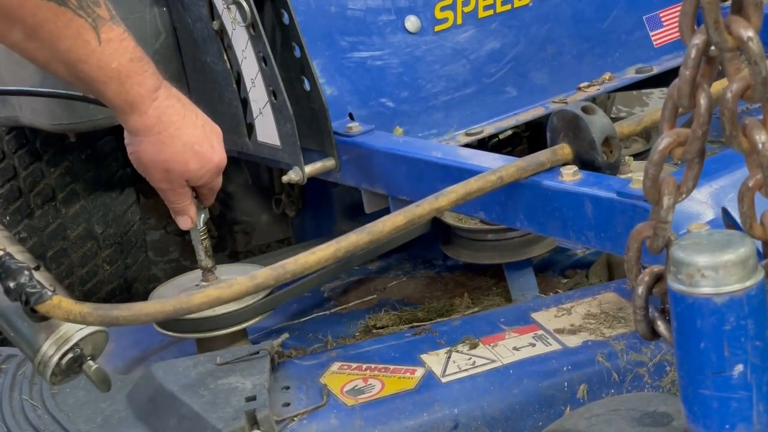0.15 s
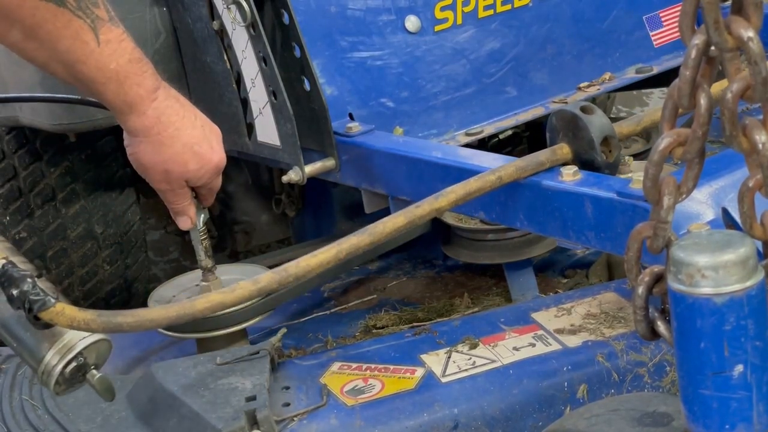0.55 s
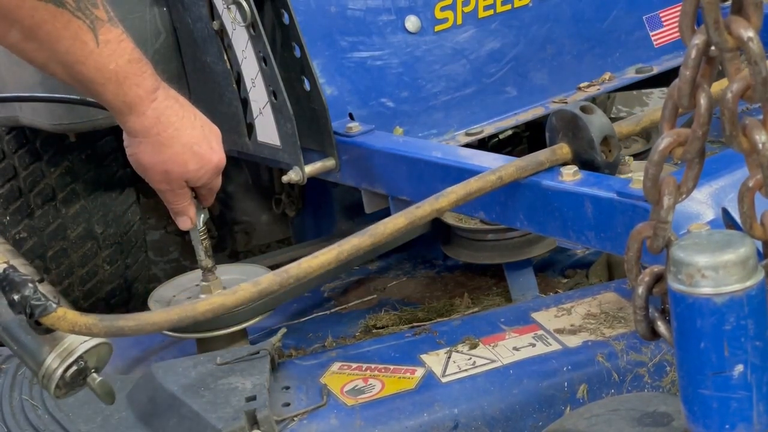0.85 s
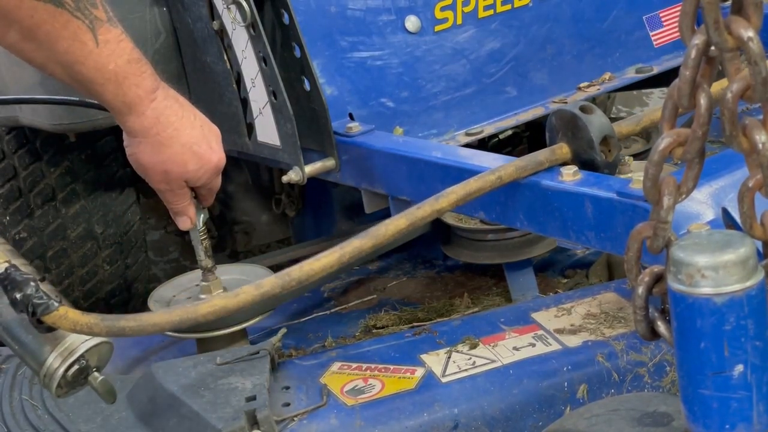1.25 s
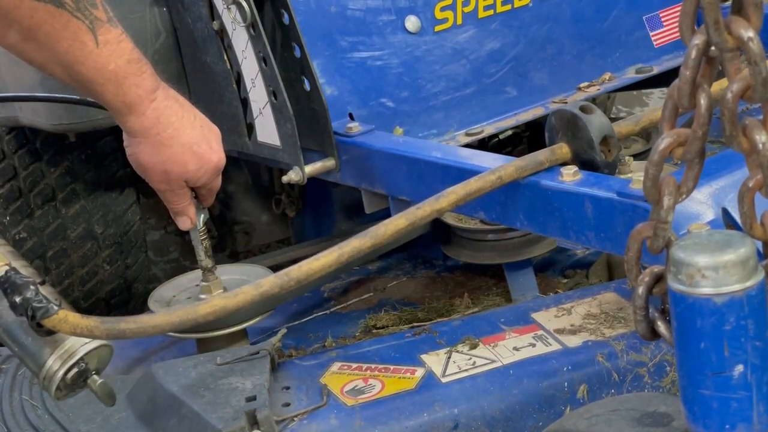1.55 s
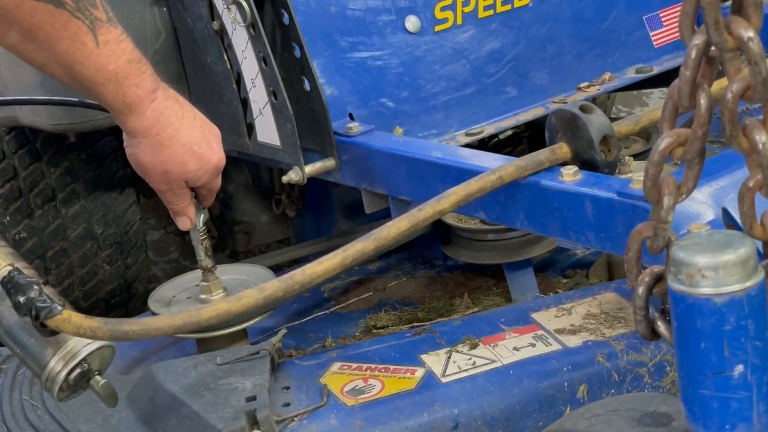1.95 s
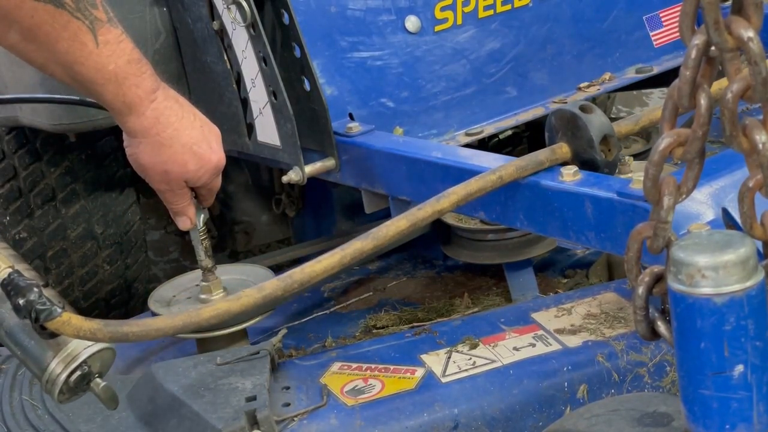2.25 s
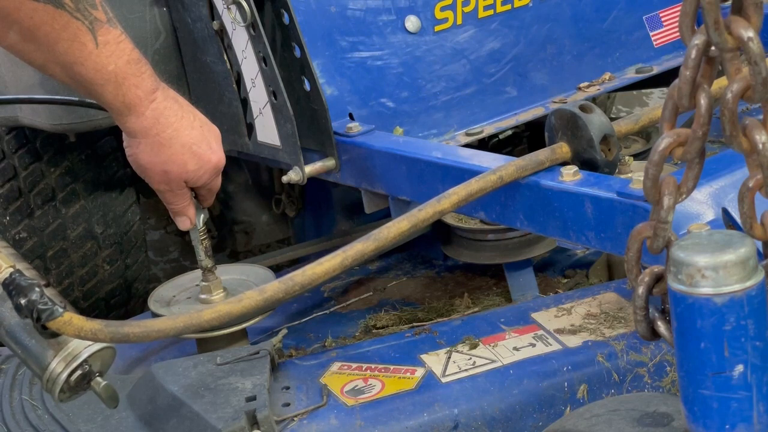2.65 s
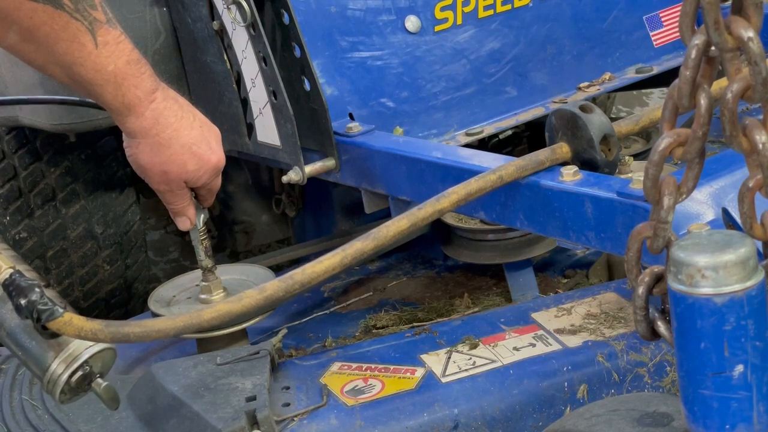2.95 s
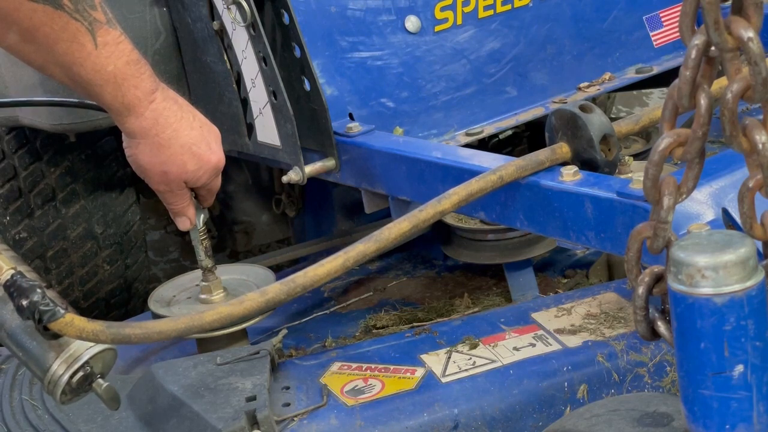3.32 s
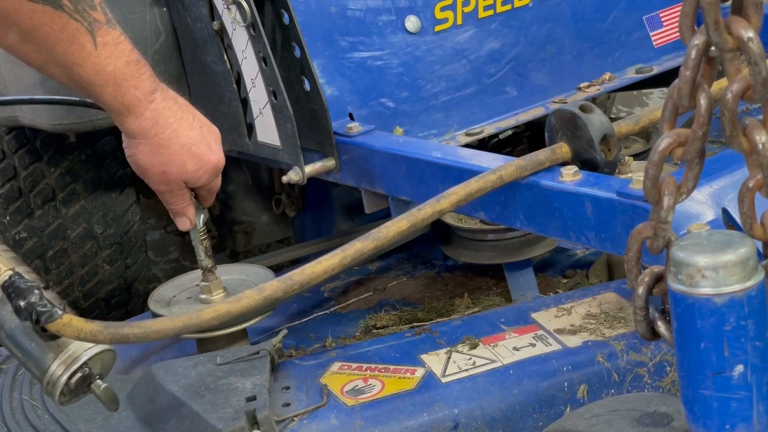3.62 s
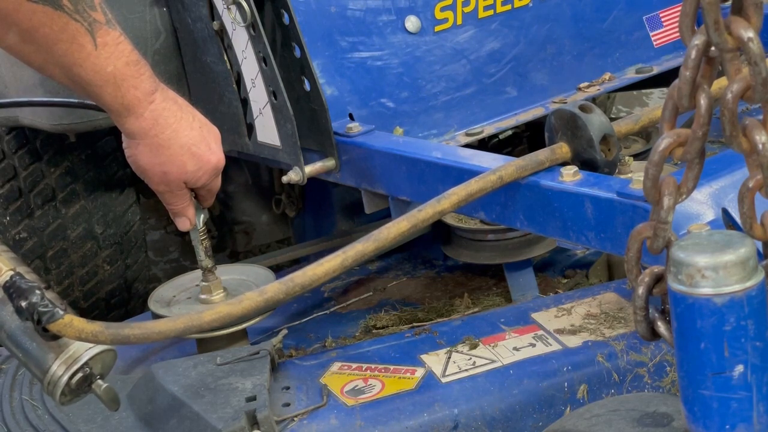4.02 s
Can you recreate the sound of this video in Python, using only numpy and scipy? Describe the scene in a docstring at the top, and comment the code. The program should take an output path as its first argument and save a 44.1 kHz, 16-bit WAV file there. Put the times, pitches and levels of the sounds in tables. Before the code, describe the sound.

An air-powered grease gun rattles at almost nine strokes a second, hissing spits loud for a second, then easing into a lighter, even clatter.

```python
"""Repair shop: an air-driven grease gun pumps into a mower spindle, nearly nine strokes a second.
Each stroke vents shaped noise (air spit) with a short chirp, a snap and a soft thump; 25 ms later the
piston knocks home as a set of damped sines. Strokes are loud for a second, then soften to an even
clatter with a few whistling accents; a thin noise sizzle lingers, and quiet hiss fills the gaps."""
import sys
import numpy as np
from scipy import signal
from scipy.fft import rfft, irfft
from scipy.io import wavfile
from scipy.ndimage import uniform_filter1d

SR = 44100
rng = np.random.default_rng(int(sys.argv[2]) if len(sys.argv) > 2 else 0)


def transcribe(signal):
    """Save signal, clipped to [-1, 1], as a 16-bit WAV file at the path in sys.argv[1]."""
    frames = np.atleast_2d(signal).T
    limited = np.clip(frames, -1, 1)
    pcm = np.round(limited * 32767).astype(np.int16)
    wavfile.write(sys.argv[1], SR, pcm)


N = 184274
LEAD_S, STROKE_SAMPLES = 0.012, 6400  # a stroke starts LEAD_S before its vent, at t = 0


def gain_of(db):
    """Decibels to amplitude."""
    return 10 ** (np.asarray(db) / 20)


def evened(x):
    """Scales to rms 1."""
    return x / np.sqrt(np.mean(x ** 2) + 1e-20)


def read(points, hz):
    """Reads a table on a log-frequency axis."""
    f, value = np.transpose(points)
    return np.interp(np.log(hz + 1), np.log(f + 1), value)


def level_at(curve, s, axis=1):
    """Reads one column of a curve at time s."""
    columns = np.transpose(curve)
    return np.interp(s, columns[0], columns[axis])


def add(mix, s, sound):
    """Mixes a sound in at time s; what falls outside is dropped."""
    start = round(s * SR)
    sound = sound[max(-start, 0):]
    part = mix[max(start, 0):][:len(sound)]
    part += sound[:len(part)]


def noise(spectrum, size):
    """Noise of rms 1 with the given spectral shape."""
    hz = np.fft.rfftfreq(size, 1 / SR)
    bins = rfft(rng.standard_normal(size))
    return evened(irfft(bins * gain_of(read(spectrum, hz)), size))


def airflow(t, peak_s, rise_s, fall_s, trail_db, trail_s):
    """The valve opens, dumps the cylinder in a burst, and trails off."""
    opening = np.exp(-(np.minimum(t - peak_s, 0) / rise_s) ** 2)
    after = np.maximum(t - peak_s, 0)
    trail = gain_of(trail_db) * np.exp(-(after / trail_s) ** 2)
    return opening * (np.exp(-after / fall_s) + trail)


# quiet shop air: (frequency [Hz], relative level [dB per Hz])
SHOP_AIR = [(20, -27), (60, 7), (200, 1), (600, -11), (1000, -4), (1600, -15), (3000, -9), (15000, -3.5)]


def ambience(level_db=-57):
    """Quiet air of the shop: steady shaped noise."""
    return gain_of(level_db) * noise(SHOP_AIR, N)


# thin, close sizzle, as of air in a narrow gap: (frequency [Hz], relative level [dB per Hz])
SIZZLE_SPECTRUM = [(4600, -45), (5400, -28.5), (6400, -36), (7700, -22), (9500, -26), (11700, -18),
                   (13300, -15), (14300, -3.5), (15100, -4.5), (15600, -6), (16200, -33)]


def sizzle(t, sizzle_db, middle_s=0.039, half_s=0.051):
    """A thin hiss, flat while the stroke pushes, mostly faded as the next begins."""
    push = np.exp(-((t - middle_s) / half_s) ** 4)
    return gain_of(sizzle_db) * noise(SIZZLE_SPECTRUM, len(t)) * push


def valve(t, valve_db, hz=380, t60_s=0.016, ahead_s=0.0095):
    """The air valve shifts ahead of the vent with a small, dull tap: one damped sine."""
    age = np.maximum(t + ahead_s, 0)
    pitch = hz * rng.uniform(0.83, 1.17)
    return gain_of(valve_db - 60 * age / t60_s) * np.sin(2 * np.pi * pitch * age)


# air burst at the exhaust port: (frequency [Hz], relative level [dB per Hz])
JET_SPECTRUM = [(200, -6.5), (700, -12.5), (1050, -6.5), (1500, -7.5), (3200, -8.5), (4200, -6),
                (6200, -7.5), (8300, -2), (10000, -0.5), (12000, 6.5), (14500, 1), (16000, -29)]
# softer air trailing the burst: (frequency [Hz], relative level [dB per Hz])
TRAIL_SPECTRUM = [(500, -19), (1500, -21), (3300, -25.5), (6200, -17.5), (8300, -11.5), (10000, -13),
                  (12000, -6.5), (13500, 1), (14900, 4), (16000, -26)]


def exhaust(t, air_db, jet_db=11.0, trail_db=4.5, wall_db=-9, sputter_db=1.63,
            open_s=0.0048, empty_s=0.069, wall_trip_s=0.053):
    """A spit of turbulent air, its slap off the far wall, and softer air as the cylinder empties."""
    flutter = uniform_filter1d(rng.standard_normal(len(t)), size=50)
    sputter = gain_of(sputter_db * evened(flutter))
    burst, slap = airflow(np.array([t, t - wall_trip_s]), peak_s=0.0025, rise_s=0.0033,
                          fall_s=0.0052, trail_db=-24.0, trail_s=0.053)
    jet = noise(JET_SPECTRUM, len(t)) * np.hypot(burst, gain_of(wall_db) * slap)
    emptying = np.exp(-(t / np.where(t < 0, open_s, empty_s)) ** 2)
    trail = noise(TRAIL_SPECTRUM, len(t)) * emptying
    return gain_of(air_db) * sputter * (gain_of(jet_db) * jet + gain_of(trail_db) * trail)


# low rush of the vented air: (frequency [Hz], relative level [dB per Hz])
RUSH_SPECTRUM = [(20, -28), (58, 6.5), (95, -7), (150, 6.5), (260, -1), (400, 0), (620, -11), (1200, -26),
                 (3000, -41)]


def thump(t, thump_db, width_s=0.002, push_db=9.5, rush_db=-4):
    """The vented volume pushes the air out and lets it back, with a low rush behind it."""
    u = t / width_s
    push = -u * np.exp(-u ** 2)
    flow = airflow(t, peak_s=0.00075, rise_s=0.0046, fall_s=0.002, trail_db=-1, trail_s=0.063)
    rush = noise(RUSH_SPECTRUM, len(t)) * flow
    return gain_of(thump_db) * (gain_of(push_db) * push + gain_of(rush_db) * rush)


def chirp(t, chirp_db, hz, peak_s=0.0016, rise_s=0.0017, fall_s=0.0021, sag_per_s=10):
    """The port whistles for about ten cycles, sinking as the pressure drops."""
    # unsteady jet: rms share of the pitch
    wander = 0.035 * evened(uniform_filter1d(rng.standard_normal(len(t)), size=14))
    sag = np.exp(-sag_per_s * (t - peak_s))
    turns = np.cumsum(hz * (sag + wander)) / SR
    swell = np.exp(-((t - peak_s) / np.where(t < peak_s, rise_s, fall_s)) ** 2)
    return gain_of(chirp_db) * swell * np.sin(2 * np.pi * (turns + rng.random()))


def snap(t, snap_db, hz, at_s=0.0007, t60_s=0.014):
    """The port cracks open with a short, dry snap at the nominal pitch of its chirp."""
    age = np.maximum(t - at_s, 0)
    return gain_of(snap_db - 60 * age / t60_s) * np.sin(2 * np.pi * hz * age)


# pump body modes under a light knock: (frequency [Hz], relative level [dB], t60 [s])
BODY_MODES = [(460, -21, 0.012), (776, -19, 0.011), (1250, 2.5, 0.015), (1450, -7, 0.013),
              (1800, 18, 0.0087), (2310, 7, 0.021)]


def knock(t, knock_db, light_db=-35, sag_per_db=0.01, damping_per_db=0.02,
          contact_s=0.00009, travel_s=0.0254):
    """The piston lands and rings the body; a harder blow presses deeper: lower and deader."""
    force_db = knock_db - light_db
    age = np.maximum(t - travel_s + rng.uniform(0, 0.0008), 0)
    detune = np.exp(0.06 * rng.standard_normal(len(BODY_MODES)))
    pitch, damping = np.exp(-sag_per_db * force_db), np.exp(damping_per_db * force_db)
    ring = np.zeros(len(t))
    for (hz, db, t60_s), off in zip(BODY_MODES, detune):
        decay = gain_of(db - 60 * damping * age / t60_s)
        ring += decay * np.sin(2 * np.pi * hz * pitch * off * age)
    contact = np.exp(-(np.arange(-20, 21) / SR / contact_s) ** 2)  # soft contact
    ring = np.convolve(ring, contact, "same")
    return -gain_of(knock_db + 4.0) * ring / abs(ring).max()


def stroke(air_db, sizzle_db, thump_db, snap_db, chirp_db, chirp_hz, knock_db,
           bounce_s=0.00266, bounce_db=-12):
    """One air motor cycle -> (valve, vent and landing with one bounce; close snap and sizzle)."""
    t = np.arange(STROKE_SAMPLES) / SR - LEAD_S
    vent = exhaust(t, air_db) + thump(t, thump_db) + chirp(t, chirp_db, chirp_hz)
    bounce = knock(t - bounce_s, knock_db) * gain_of(bounce_db)
    landing = knock(t, knock_db) + bounce
    pump = valve(t, thump_db + 3.5) + vent + landing
    return pump, snap(t, snap_db, chirp_hz) + sizzle(t, sizzle_db)


# stroke spacing; drags a little as the pump softens: (time [s], period [s])
STROKE_PERIOD = [(1.15, .11405), (1.6, .11492), (2.2, .1141)]
# how hard the motor vents; snap, thump and knock follow: (time [s], exhaust level [dB])
VENT_EFFORT = [(.8, -26), (.93, -27), (1.05, -31), (1.16, -36.5), (1.4, -44), (1.85, -45.5)]
# sizzle and chirp die down later than the exhaust: (time [s], sizzle level [dB], chirp level [dB])
LINGER = [(0, -21.5, -30.5), (.8, -21.5, -28.5), (1.28, -25.5, -23.5), (1.39, -27, -27), (1.6, -31.5, -29),
          (1.74, -32.5, -31.5), (1.85, -40, -29.5), (2.2, -41.5, -31.5), (4.1, -41.5, -34)]
# strokes where the port catches and whistles out:
# (time [s], extra chirp and snap [dB], nominal chirp pitch [Hz], extra knock [dB])
WHISTLES = [(.02, 11.5, 2512, 0.5), (.25, 5.5, 2510, 0.5), (.48, 8, 2520, 0.5), (.59, 6.5, 2510, 0),
            (.82, 5, 2446, 0.5), (2.19, 4, 2436, 1.5), (2.42, 1.5, 2610, 3.5), (2.88, 9, 2522, 3.5),
            (3.33, 6, 2450, 3)]
# (soft stroke, hard stroke), before accents and scatter
EXHAUST_DB, THUMP_DB, SNAP_DB = (-45.5, -25.5), (-53.5, -34.5), (-42, -20.5)
KNOCK_DB, CHIRP_HZ = (-35, -17), (2426, 2504)


def strokes(first_vent_s=0.0201, blow_power=1.63, limp_chirp_db=1.5, limp_knock_db=0.3,
            scatter_db=0.44, scatter_pitch=0.0165):
    """The piston shuttles to and fro, effort sets each stroke -> (vent time [s], stroke arguments)."""
    s, direction = first_vent_s - level_at(STROKE_PERIOD, 0), 1
    soft_db, hard_db = EXHAUST_DB
    while s < N / SR:
        period, air_db = level_at(STROKE_PERIOD, s), level_at(VENT_EFFORT, s)
        sizzle_db, chirp_db = level_at(LINGER, s), level_at(LINGER, s, axis=2)
        # blows weaken sooner than the exhaust
        hard = max((air_db - soft_db) / (hard_db - soft_db), 0) ** blow_power
        thump_db, snap_db, chirp_hz, knock_db = (
            low + hard * (high - low) for low, high in (THUMP_DB, SNAP_DB, CHIRP_HZ, KNOCK_DB))
        limp = direction * (1 - hard)  # soft strokes: louder one way, quieter the other
        accents = (row for at, *row in WHISTLES if abs(at - s) < period / 2)
        whistle_db, chirp_hz, slam_db = next(accents, (0, chirp_hz, 0))
        chance = rng.standard_normal(4)
        thump_db += scatter_db * chance[0]
        chirp_db += limp_chirp_db * limp + whistle_db + scatter_db * chance[1]
        knock_db += limp_knock_db * limp + slam_db + scatter_db * chance[2]
        chirp_hz *= 1 + scatter_pitch * chance[3]
        snap_db += whistle_db
        yield s, air_db, sizzle_db, thump_db, snap_db, chirp_db, chirp_hz, knock_db
        s, direction = s + period, -direction


# shop reverberation time: (frequency [Hz], t60 [s])
REVERB_T60 = [(100, 0.76), (400, 0.19), (1000, 0.2), (2500, 0.2), (6000, 0.26), (14000, 0.51)]
# reverberant energy against the direct sound: (frequency [Hz], level [dB])
REVERB_LEVEL = [(60, -4), (300, 1.5), (1000, -5.5), (1600, -7), (2300, -1.5), (2700, -5), (6000, 2),
                (14000, -1)]
# single reflections from the floor and the mower: (delay [s], level [dB])
REFLECTIONS = [(0.0131, -16), (0.0255, -15)]


def shop(x, build_s=0.01):
    """Direct sound, two reflections, and a diffuse field whose energy dies away band by band."""
    frames = dict(nperseg=256, noverlap=192)
    hz, t, z = signal.stft(x, SR, **frames)
    age = t[t < 0.5]
    fall = gain_of(-60 * age / read(REVERB_T60, hz)[:, None])
    decay = (fall * (1 - np.exp(-age / build_s))) ** 2
    decay /= decay.sum(1, keepdims=True)
    energy = signal.fftconvolve(abs(z) ** 2, decay, axes=1)[:, :len(t)]
    # countless paths: random phase
    scatter = signal.stft(rng.standard_normal(len(x)), SR, **frames)[2]
    level = gain_of(read(REVERB_LEVEL, hz))[:, None]
    field = np.sqrt(abs(energy)) * level * scatter / scatter.std()
    out = x + signal.istft(field, SR, **frames)[1][:len(x)]
    for delay_s, db in REFLECTIONS:
        add(out, delay_s, gain_of(db) * x)
    return out


def scene():
    """The running pump rings through the shop; snap and sizzle are too close to stir the room."""
    run_up = SR // 4  # samples, cut off after the reverberation
    pump, close = np.zeros((2, run_up + N))
    for s, *settings in strokes():
        for track, sound in zip((pump, close), stroke(*settings)):
            add(track, run_up / SR + s - LEAD_S, sound)
    mix = (shop(pump) + close)[run_up:] + ambience()
    return np.array([mix, mix])


def record(dry, low_cut_hz=36, edge_hz=15800):
    """One small microphone with a low cut, then the band limit; both channels alike."""
    low_cut = signal.butter(2, low_cut_hz, "highpass", fs=SR, output="sos")
    thinned = signal.sosfilt(low_cut, dry)
    band_limit = signal.firwin(511, edge_hz, window=("kaiser", 9), fs=SR)
    return signal.oaconvolve(thinned, band_limit[None], "same")


dry = scene()
out = record(dry)
transcribe(out)
```